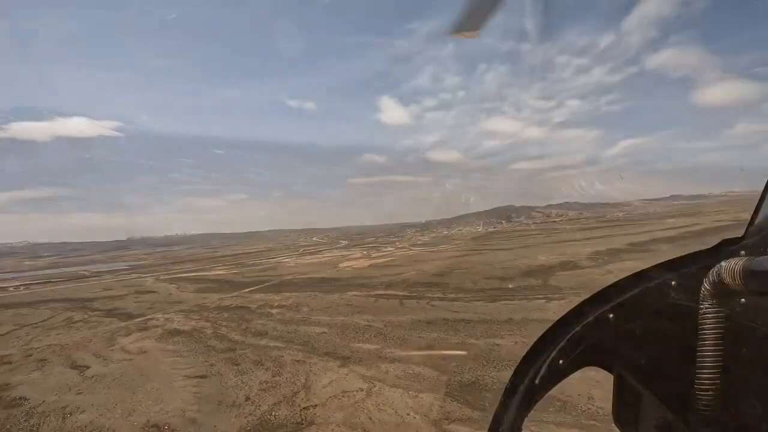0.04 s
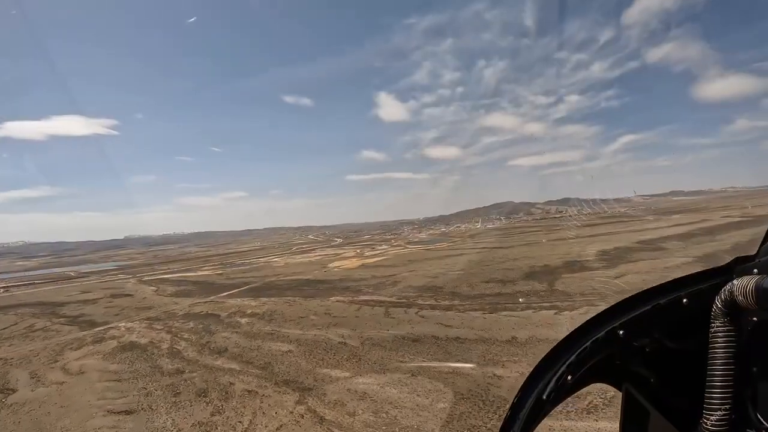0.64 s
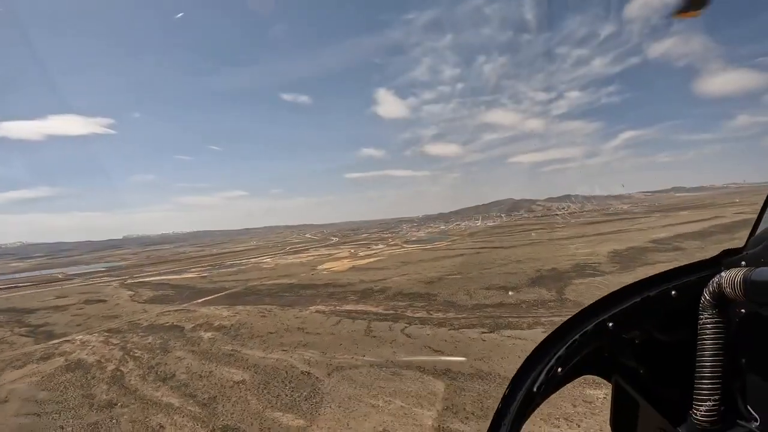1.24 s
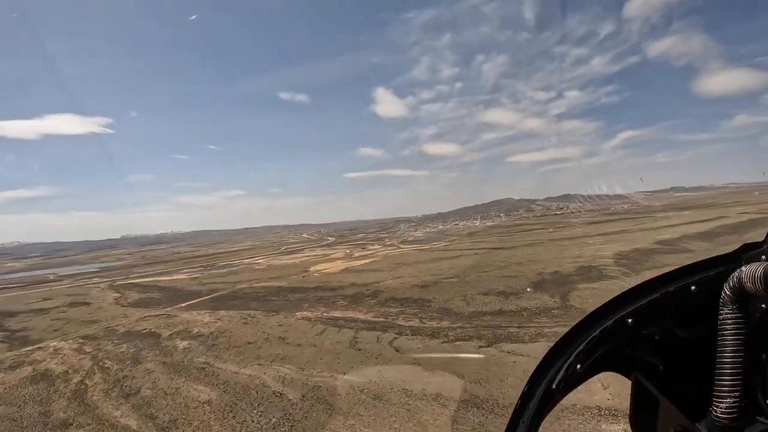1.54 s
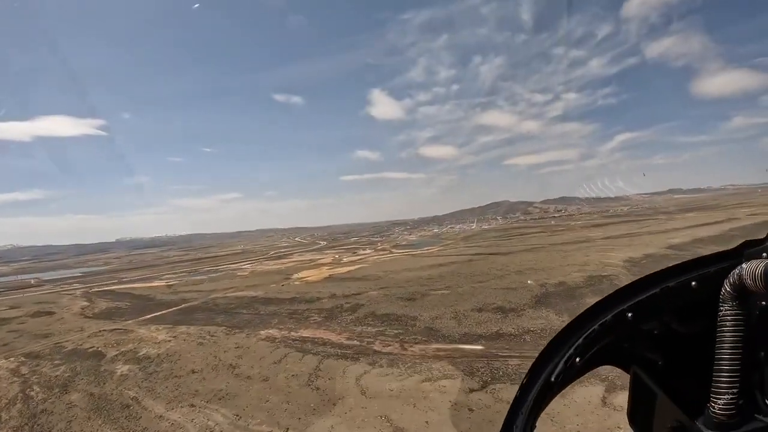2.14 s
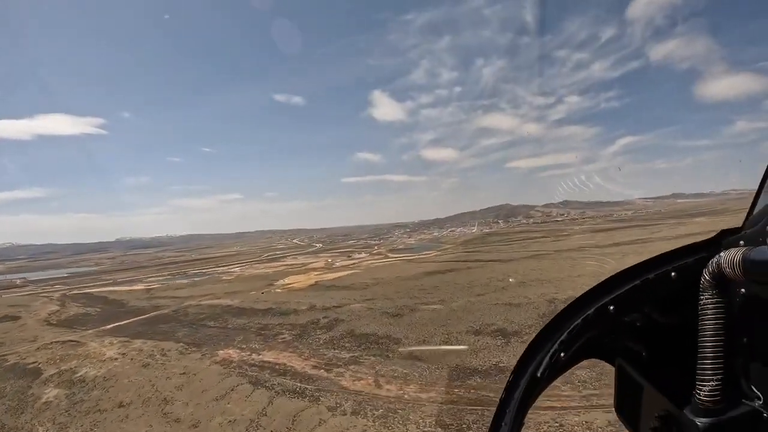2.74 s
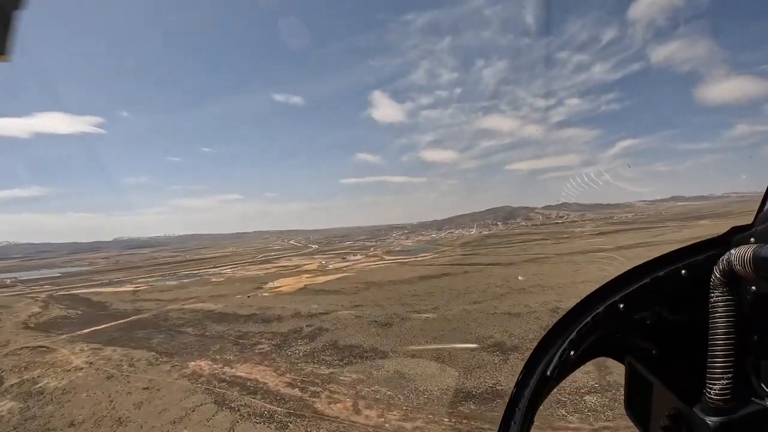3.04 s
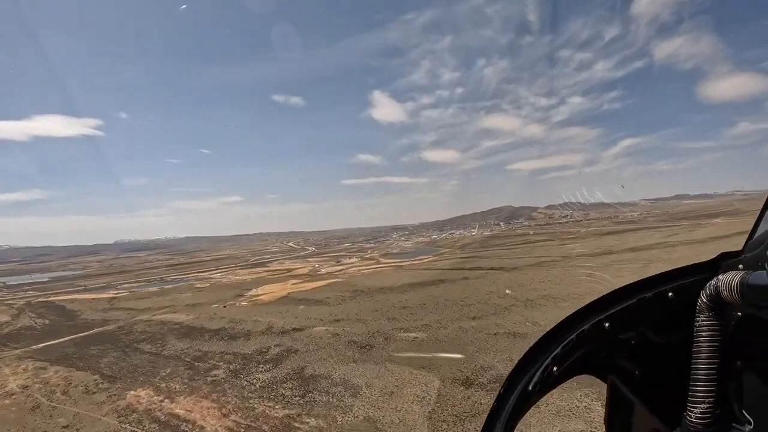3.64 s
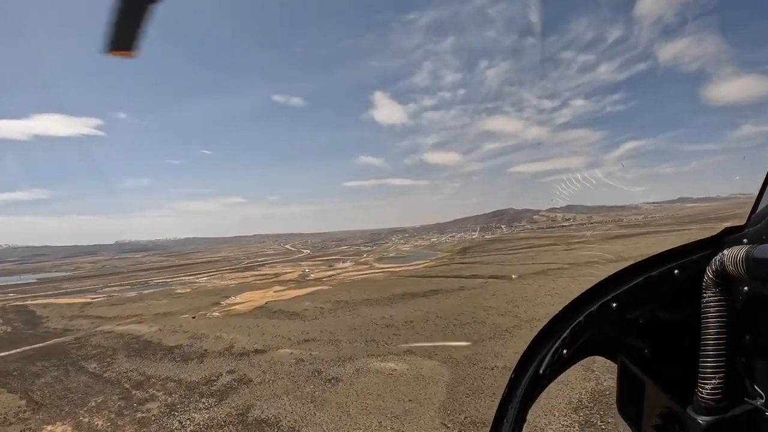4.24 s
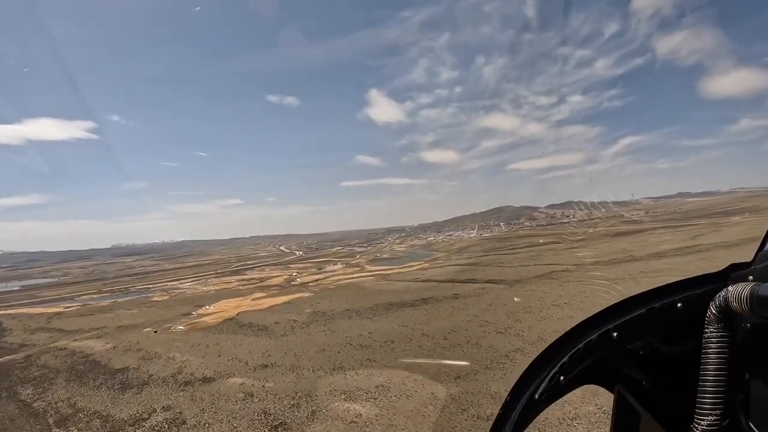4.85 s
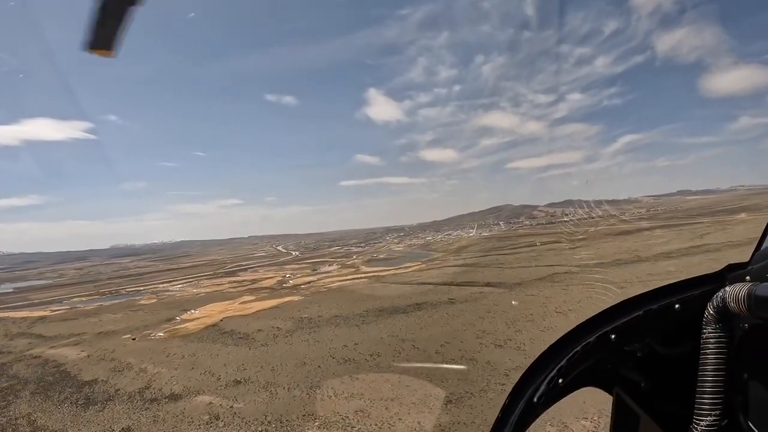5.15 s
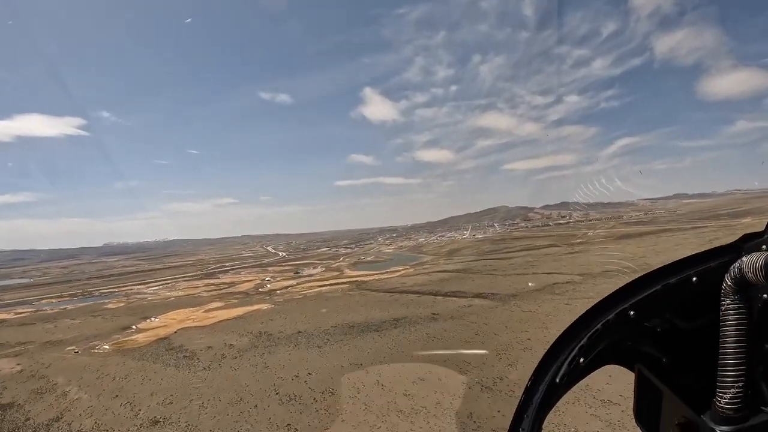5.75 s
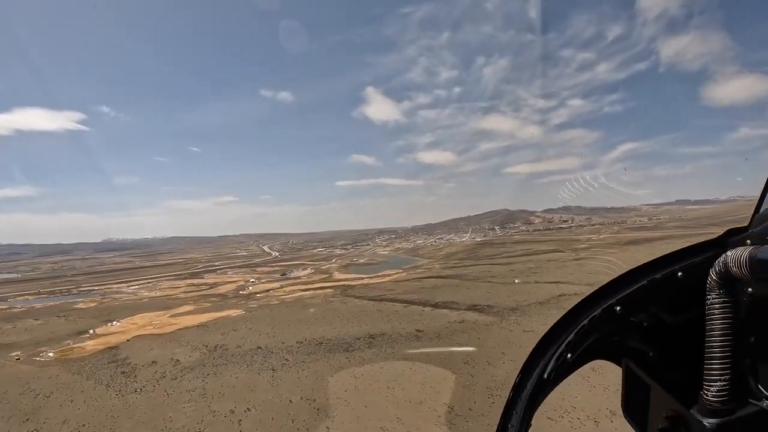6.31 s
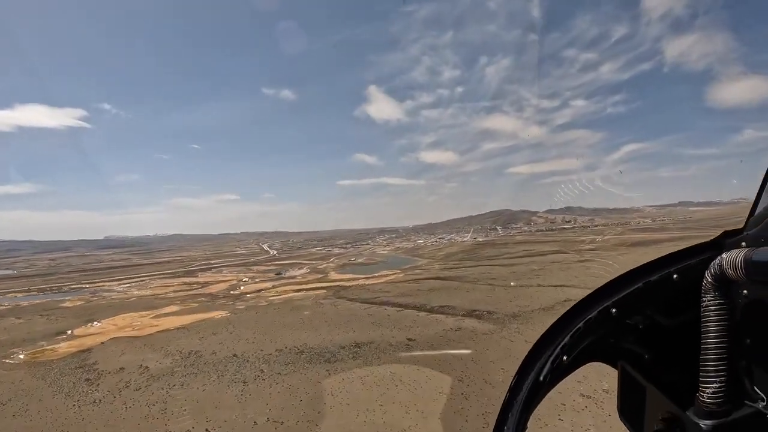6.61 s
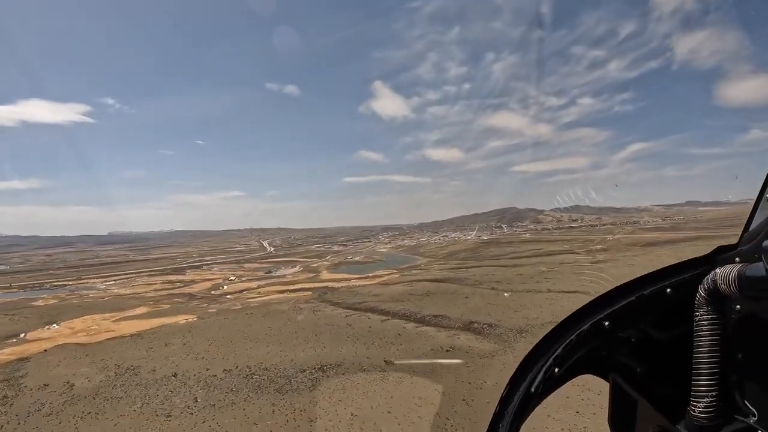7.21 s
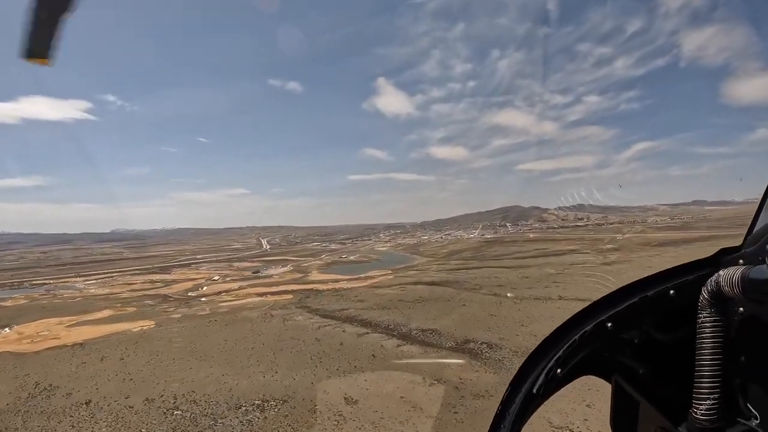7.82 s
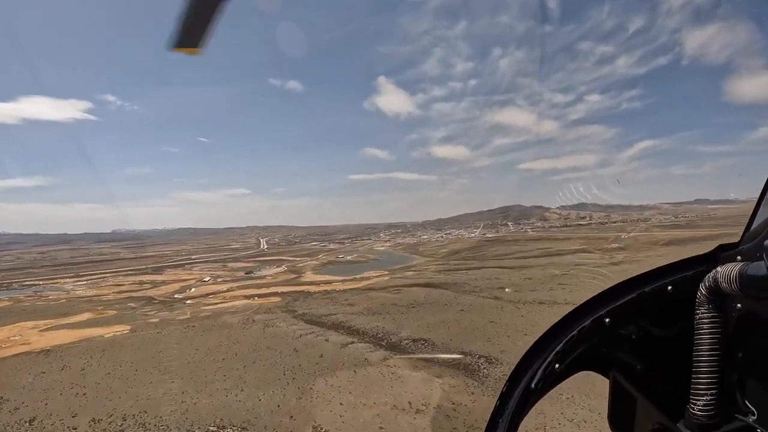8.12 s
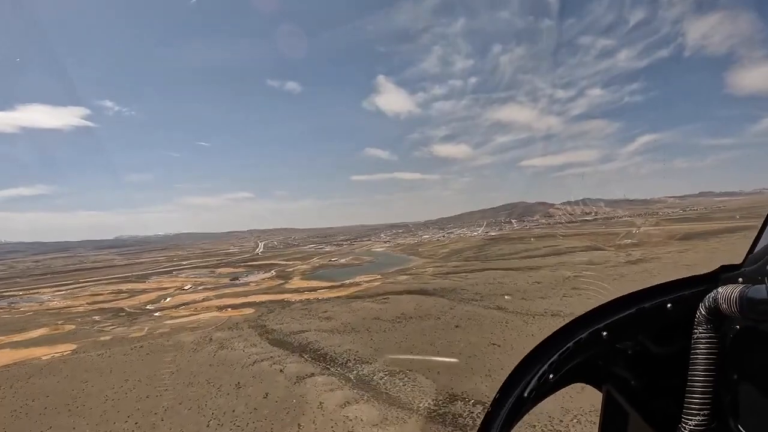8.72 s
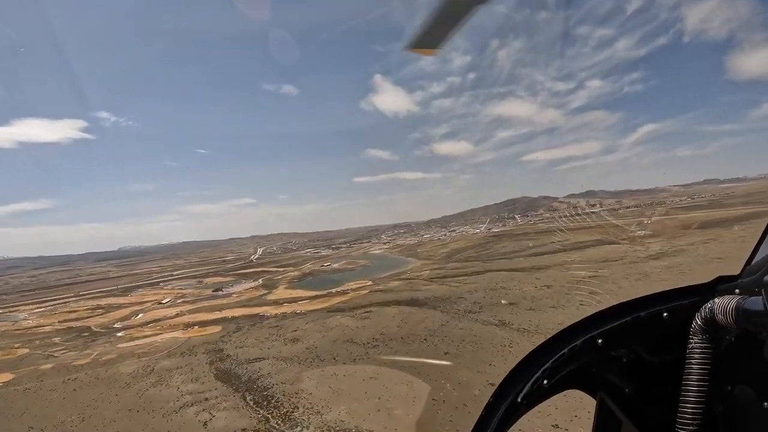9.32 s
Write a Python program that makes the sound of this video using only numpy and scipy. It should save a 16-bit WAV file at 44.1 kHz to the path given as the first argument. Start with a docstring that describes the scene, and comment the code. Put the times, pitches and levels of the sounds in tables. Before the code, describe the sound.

A helicopter in steady flight is heard from inside the cabin for about nine seconds. From the start, a constant roar of air rings in the enclosed space, over a deep, unevenly buffeting rumble from the rotor's wake. The main rotor's fast, low throb swells briefly at about 0.6 seconds and again around 1.3 to 1.6, is strongest from roughly 2.2 to 4 seconds, then mostly sinks into the rumble after 5.5. Throughout, the tail rotor adds a low drone that surges a few times a second, with a hum beneath it. A softer hiss of air along the canopy rises and falls gently. In the background, a thin, high gear whine wavers, ringing clearly in short spells and flickering in between, joined by a lower whine and a very faint turbine whistle. The engine speed holds steady to the end.

```python
"""A roar of air and a buffeting rumble fill the cabin of a helicopter in steady flight.
The main rotor throbs under the rumble of its wake, and the tail rotor drones in surges.
Rushing air rings the cabin's resonances and hisses along the canopy.
Behind them, meshing gear teeth and the turbine add thin, wavering whines."""
import sys
import numpy as np
from scipy import signal
from scipy.fft import rfft, irfft, next_fast_len
from scipy.io import wavfile
from scipy.ndimage import uniform_filter1d, minimum_filter1d, map_coordinates

SR = 44100
rng = np.random.default_rng(int(sys.argv[2]) if len(sys.argv) > 2 else 0)


def put_to_file(sound):
    """Save the sound as 16-bit audio at rate SR, in the file named by the first command-line argument."""
    columns = np.atleast_2d(sound).T  # one column per channel
    safe = np.clip(columns, -1, 1)
    whole_steps = np.round(safe * 32767)
    wavfile.write(sys.argv[1], SR, whole_steps.astype(np.int16))


N = 413216
BLADE_HZ = 39.1  # main rotor blade passage


def amp(db):
    """Decibels to gain."""
    return 10 ** (np.asarray(db) / 20)


def unit(x):
    """Scale to rms 1."""
    return x / np.sqrt(np.mean(np.abs(x) ** 2) + 1e-20)


def curve(rows):
    """One value per sample from (time [s], value) rows."""
    return np.interp(np.arange(N) / SR, *np.transpose(rows))


def spectrum_db(rows, hz):
    """(frequency [Hz], level [dB]) rows joined on a log axis."""
    knots_hz, knots_db = np.transpose(rows)
    return np.interp(np.log(hz + 1), np.log(knots_hz + 1), knots_db)


def wobble(rate_hz):
    """Smooth random curve, rate_hz knots a second."""
    knots = rng.standard_normal(int(N * rate_hz / SR) + 4)
    return map_coordinates(knots, [np.arange(N) * rate_hz / SR])


def filtered(x, response):
    """Apply a gain given as a function of Hz."""
    size = next_fast_len(N + SR // 2)
    return irfft(rfft(x, size) * response(np.fft.rfftfreq(size, 1 / SR)), size)[:N]


def noise(shape_db):
    """Noise of rms 1, its spectrum a function of Hz."""
    size = next_fast_len(N)
    hz = np.fft.rfftfreq(size, 1 / SR)
    white = rng.standard_normal(len(hz)) + 1j * rng.standard_normal(len(hz))
    return unit(irfft(amp(shape_db(hz)) * white, size)[:N])


def steadied(x, samples):
    """Even out swells longer than the window."""
    return x / np.sqrt(np.abs(uniform_filter1d(np.abs(x) ** 2, samples)) + 1e-9)


def patchy(x, depth_db):
    """Random gain in patches of about 80 Hz by 0.2 s; output rms 1."""
    frames = signal.stft(x, nperseg=2048)[2]
    patches = uniform_filter1d(rng.standard_normal(frames.shape), size=4, axis=0)
    patches = uniform_filter1d(patches, size=9, axis=1)
    return unit(signal.istft(frames * amp(depth_db * unit(patches)), nperseg=2048)[1][:N])


def tone(hz, speed, half_width_hz, scatter):
    """Machine tone: a steady part plus a share scattered by turbulence into a narrow band."""
    size = 16384
    offset_hz = np.fft.fftfreq(size, N / SR / size)
    skirt = 1 / np.sqrt((1 + (offset_hz / half_width_hz) ** 2)
                        * (1 + (offset_hz / (6 * half_width_hz)) ** 2))
    eddies = unit(np.fft.ifft(skirt * (rng.standard_normal(size) + 1j * rng.standard_normal(size))))
    swirl = steadied(np.sqrt(1 - scatter) + np.sqrt(scatter) * eddies, samples=600)
    swirl = np.interp(np.arange(N) * size / N, np.arange(size), swirl)
    return unit(np.real(swirl * np.exp(2j * np.pi * hz * np.cumsum(speed) / SR)))


def swell(middle_s, length_s, edge_s):
    """Envelope within 0..1: soft rise, hold, soft fall."""
    inside_s = (length_s + edge_s) / 2 - np.abs(np.arange(N) / SR - middle_s)
    return np.sin(np.pi / 2 * np.clip(inside_s / edge_s, 0, 1)) ** 2


def surging(rows, hz, speed, edge_s, detune, slip_turns, sag_hz=0, settle_s=0.093):
    """Tone in surges, each with a random phase slip and detuning; pitch sags by sag_hz at their ends."""
    out, t = np.zeros(N), np.arange(N) / SR
    turns, phase = hz * np.cumsum(speed) / SR, 0
    for (middle_s, length_s, db), (step, shift) in zip(rows, rng.uniform(-1.005, 1, (len(rows), 2))):
        envelope = swell(middle_s, length_s, edge_s)
        span = envelope > 0
        phase += slip_turns * step
        inside_s = np.maximum(length_s / 2 - np.abs(t[span] - middle_s), 0)
        bend_hz = hz * detune * shift - sag_hz * np.exp(-inside_s / settle_s)
        carrier = np.sin(2 * np.pi * (turns[span] + phase + np.cumsum(bend_hz) / SR))
        out[span] += amp(db) * envelope[span] * carrier
    return np.sqrt(2) * out


# air along the canopy: (time [s], level [dB])
SLIPSTREAM_DB = [(0, -51.5), (.2, -47), (.42, -45.5), (.81, -48.5), (1.08, -44.5), (1.25, -46.5),
                 (1.68, -43), (2.0, -46), (2.11, -44.5), (2.24, -47), (2.65, -44.5), (3.03, -43.5),
                 (3.12, -43), (3.25, -44.6), (3.55, -46.5), (3.8, -48), (4.14, -43.5), (4.33, -45.5),
                 (4.7, -49.5), (5.05, -48), (5.25, -45), (5.7, -44), (6.03, -43), (6.3, -45.3),
                 (6.75, -46.5), (7.4, -45), (7.7, -46.5), (7.92, -44.5), (8.3, -48), (8.5, -46),
                 (8.72, -49.5), (8.9, -46.5), (9.37, -48)]

def slipstream():
    """Rush of air in dB: its level, and its swing about the mean."""
    db = curve(SLIPSTREAM_DB)
    return db, db - db.mean()


# blade rows: (centre [Hz], half width [Hz], level re slipstream [dB])
TURBINE_BANDS = [(7895, 80, -43.5), (10120, 260, -42.5), (12160, 400, -37), (13750, 290, -41.2)]
# lower whistle: (time [s], level [dB])
WHISTLE_DB = [(0, -84), (.8, -84.5), (1.1, -77.5), (4.1, -78), (4.7, -83), (5.75, -75), (6.6, -77),
              (7.05, -74.5), (8.3, -79), (8.85, -73), (9.37, -73)]
# upper whistle: (middle [s], length [s], level [dB])
WHISTLE_GLINTS = [(.55, .03, -81.5), (1.02, .03, -82), (2.11, .09, -78.5), (3.29, .035, -76),
                  (3.49, .04, -82), (4.27, .04, -79.5), (4.44, .05, -79), (4.56, .04, -75),
                  (4.99, .06, -81), (5.56, .04, -80), (6.07, .04, -76), (6.99, .035, -77.5),
                  (8.68, .04, -83), (9.19, .04, -78)]

def turbine(speed, rush_db):
    """The compressor whistles and glints; its blade rows sing in bands that follow the rush of air."""
    bands = sum(amp(db) * noise(lambda hz: -20 * np.log10(1 + ((hz - centre_hz) / half_width_hz) ** 2))
                for centre_hz, half_width_hz, db in TURBINE_BANDS)
    bands *= amp(rush_db + 1.2 * wobble(25))
    whistle = amp(curve(WHISTLE_DB)) * tone(4775, speed, half_width_hz=20, scatter=0.85)
    glints = surging(WHISTLE_GLINTS, 7920, speed, edge_s=0.02, detune=0.002, slip_turns=0.5)
    return bands + whistle + glints


# main mesh ringing clear: (middle [s], length [s], level [dB])
MESH_SPELLS = [(.06, .14, -50), (.4, .14, -49), (0.592, .21, -45.5), (0.78, 0.13, -49), (1.162, .09, -48.5),
               (1.58, 0.073, -51), (1.85, 0.21, -52), (2.144, 0.24, -45.3), (2.625, 0.18, -47),
               (2.767, .11, -43.5), (3.112, 0.15, -42.5), (3.265, 0.15, -45.5), (3.663, .57, -48.5),
               (4.27, .1, -49), (4.765, .66, -45.5), (5.4, .28, -48.8), (6.113, .17, -45),
               (6.81, 0.065, -49.5), (6.93, 0.16, -47), (7.67, 0.15, -48.5), (8.29, 0.14, -47.5),
               (8.558, .09, -46.5), (8.755, 0.11, -46.5), (8.965, 0.075, -45.5)]
# lower mesh: (time [s], level [dB])
LOWER_MESH_DB = [(0, -52), (.95, -49.5), (1.02, -43), (1.15, -55.5), (1.6, -41), (1.87, -61), (2.06, -39),
                 (2.2, -49), (2.48, -40), (2.62, -47), (3.15, -46), (3.6, -47), (4.19, -55), (4.26, -35),
                 (4.34, -48), (4.72, -49.5), (5.75, -43.5), (6.5, -47.5), (7.3, -46), (7.42, -36),
                 (7.55, -49), (7.71, -39), (7.79, -42), (7.88, -41), (8.15, -43), (8.43, -49), (8.66, -44),
                 (9.0, -40.5), (9.23, -53), (9.37, -42.5)]
# faint drive train tones: (frequency [Hz], width [Hz], level [dB])
FAINT_WHINES = [(1467, 14, -53.8), (2448, 16, -68), (2800, 24, -74), (2935, 36, -70.5), (3965, 24, -76.5)]

def gearbox(speed, swing_db):
    """Meshing teeth whine: the main tone rings in spells and flickers between; faint ones ride the air."""
    mesh_hz, sag_hz, edge_s = 1897, 9, 0.035
    flutter_db = 1.15 * wobble(55) - 0.55 * np.minimum(wobble(22), 0) ** 2  # tremble and brief dips
    clear = surging(MESH_SPELLS, mesh_hz, speed, edge_s, detune=0.0006, slip_turns=0.25, sag_hz=sag_hz)
    ringing = sum(swell(middle_s, length_s, edge_s) for middle_s, length_s, _ in MESH_SPELLS)
    flicker = amp(-52.5 - 4 * ringing) * tone(mesh_hz - sag_hz / 2, speed, half_width_hz=17, scatter=0.97)
    lower = amp(curve(LOWER_MESH_DB)) * tone(1294, speed, half_width_hz=14, scatter=0.95)
    faint = sum(amp(db) * tone(hz, speed, width_hz / 2, scatter=0.8) for hz, width_hz, db in FAINT_WHINES)
    return amp(flutter_db) * clear + flicker + lower + amp(0.97 * swing_db) * faint


# cabin air noise: (frequency [Hz], relative density [dB])
ROAR_SPECTRUM = [(25, 1.5), (60, -2.5), (100, 0), (135, -2), (185, 0.5), (225, -5.5), (310, -4),
                 (400, -7.5), (540, -10.5), (730, -13), (920, -20), (1200, -23), (1480, -33.5), (3000, -56),
                 (9000, -110)]
# air and panel resonances: (centre [Hz], width [Hz], lift [dB])
CABIN_MODES = [(268.7, 45, 3.5), (351.6, 22, 2.5), (431, 24, 4.5), (486.4, 38, 4.5), (583.5, 11, 4),
               (666, 56, 2.5), (763, 15, 2.5), (819, 55, 4), (1093, 50, 3), (1284, 190, 2.5)]
# irregular swells and dips in the roar's low-mid band: (time [s], gain [dB])
LOW_MID_DB = [(0, -1), (.45, -1), (.68, -1.2), (.97, -2), (1.2, 2.5), (1.38, -2), (1.53, 3), (1.85, -2.5),
              (2.1, 0.5), (2.3, -1.5), (3.3, -0.1), (3.57, 0.7), (3.76, -1), (4.08, -1), (4.25, .8),
              (5.35, 0), (5.5, 2.5), (5.7, 1), (6.0, -1.7), (6.35, 3), (6.6, 0.5), (6.8, 2.5), (7.2, -0.5),
              (7.47, 1.5), (7.9, -0.1), (8.37, 2), (8.85, -1.3), (9.15, 1.5), (9.37, -3)]
# droning canopy panel: (time [s], gain [dB])
PANEL_DB = [(0, -0.5), (1.2, 0.5), (1.75, 1), (2.7, 0.5), (3.3, -1), (4.2, 0.5), (4.7, 3.5), (5.3, -1),
            (6.2, 0.5), (7.0, 0.7), (7.7, -1), (8.4, 0), (9.37, 1.5)]

def cabin_roar(swing_db):
    """Air roars through the cabin's resonances; above the crossover it follows the slipstream."""
    low_mid_hz, panel_hz, panel_half_width_hz, crossover_hz = 330, 480, 45, 583

    def modes_db(hz):
        return sum(db / (1 + (2 * (hz - centre) / width) ** 4) for centre, width, db in CABIN_MODES)

    roar = noise(lambda hz: spectrum_db(ROAR_SPECTRUM, hz) + modes_db(hz))
    roar = steadied(patchy(roar, depth_db=0.53), samples=6000)
    low_mid = filtered(roar, lambda hz: 1 / (1 + (2 * np.log((hz + 1) / low_mid_hz)) ** 4))
    roar += amp(curve(LOW_MID_DB)) * low_mid.std() * steadied(low_mid, samples=6000) - low_mid
    panel = filtered(roar, lambda hz: 1 / (1 + ((hz - panel_hz) / panel_half_width_hz) ** 4))
    roar += (amp(curve(PANEL_DB)) - 1) * panel
    deep = filtered(roar, lambda hz: 1 / (1 + (hz / crossover_hz) ** 6))
    return deep + amp(0.6 * swing_db) * (roar - deep)


# canopy hiss: (frequency [Hz], relative density [dB])
HISS_SPECTRUM = [(500, -4.5), (1200, 6.5), (1650, 4.5), (2000, 6), (2350, -1), (3300, -1.5), (3650, -7),
                 (5000, -13.5), (7500, -21.5), (9700, -31), (10700, -39.5), (13200, -37), (14300, -31.5),
                 (15700, -45)]
# cabin roar: (time [s], level [dB])
ROAR_DB = [(0, -23), (.42, -20), (1, -22.5), (1.5, -22.5), (2.4, -21.5), (3.55, -21.5), (3.8, -23),
           (4.3, -22), (6.5, -21.5), (9.37, -21.5)]

def airflow(speed, rush_db, swing_db):
    """Cabin roar and canopy hiss, shaken by the same eddies and pulsing a little with each blade."""
    roar = cabin_roar(swing_db)
    hiss = patchy(noise(lambda hz: spectrum_db(HISS_SPECTRUM, hz)), depth_db=1.5)
    beat = np.sin(2 * np.pi * BLADE_HZ * np.cumsum(speed) / SR)
    eddies, gusts = wobble(50), wobble(20)
    roar_db = curve(ROAR_DB) - 0.37 * gusts + 0.92 * eddies + 0.82 * beat
    hiss_db = rush_db + 0.84 * eddies + 0.2 * beat
    return amp(roar_db) * roar + amp(hiss_db) * hiss


# tail rotor drone: (middle [s], length [s], level [dB])
TAIL_SURGES = [(.2, 0.081, -21), (.32, 0.079, -27), (.55, 0.35, -28), (.8, 0.17, -25.5),
               (1.09, 0.36, -23.5), (1.46, 0.32, -20.3), (1.855, 0.35, -22.5), (2.145, .16, -23.5),
               (2.5, 0.15, -25.5), (2.81, 0.31, -24), (3.05, 0.16, -25), (3.26, 0.29, -27),
               (3.53, 0.14, -30.5), (3.77, 0.19, -27), (4.01, .23, -24), (4.26, 0.18, -23),
               (4.74, 0.2, -24), (4.99, 0.27, -26.5), (5.3, 0.18, -24), (5.645, 0.091, -20.3),
               (5.79, 0.077, -23.5), (5.93, 0.11, -28), (6.125, .14, -21), (6.455, 0.091, -20.5),
               (6.585, 0.15, -21.5), (6.92, 0.19, -21), (7.28, 0.11, -20.8), (7.45, .12, -27),
               (7.66, 0.23, -28), (7.86, 0.14, -24.5), (8.0, 0.13, -23.3), (8.21, 0.24, -28),
               (8.41, 0.05, -26), (8.55, 0.2, -24.5), (8.83, 0.14, -25), (8.99, 0.14, -23),
               (9.32, 0.13, -23)]
# hum an octave below: (time [s], level [dB])
TAIL_HUM_DB = [(0, -33), (1, -34), (1.65, -23.5), (2, -36), (3.3, -36), (3.7, -38), (4.15, -28.5),
               (4.7, -39.5), (6.1, -26.5), (6.9, -42), (7.8, -27), (8.3, -32.5), (9.37, -30.5)]

def tail_rotor(speed):
    """The drone surges a few times a second in the main rotor's wake, over a rough bed and a hum."""
    tail_hz, bed_db = 169.4, -36.5
    drone = surging(TAIL_SURGES, tail_hz, speed, edge_s=0.08, detune=0.008, slip_turns=0.25)
    bed = amp(bed_db) * tone(tail_hz, speed, half_width_hz=3.9, scatter=1.0)
    hum = amp(curve(TAIL_HUM_DB)) * tone(tail_hz / 2, speed, half_width_hz=5.5, scatter=0.91)
    return drone + bed + hum


# blade throb: (time [s], level [dB])
THROB_DB = [(0, -40), (.48, -34), (.6, -18.5), (.74, -34), (1.15, -31), (1.27, -21), (1.6, -22), (1.7, -36),
            (1.9, -25), (2.15, -31), (2.26, -16), (2.42, -19.5), (2.54, -17), (2.68, -21), (2.85, -14.5),
            (3.14, -20), (3.25, -15.5), (3.4, -15.5), (3.52, -18.5), (3.64, -22), (3.73, -18), (3.87, -19),
            (4.05, -33.5), (4.95, -26), (5.2, -29), (5.46, -23), (5.6, -34.5), (9.37, -37)]
# target for throb plus wake rumble: (time [s], level [dB])
ROTOR_TOTAL_DB = [(0, -20.5), (.42, -28.5), (.56, -15.5), (.8, -18), (1.16, -26.5), (1.28, -18),
                  (1.58, -19), (1.69, -24.5), (1.92, -20), (2.25, -15.5), (2.42, -21.5), (2.54, -19.5),
                  (2.95, -17), (3.06, -16), (3.18, -14), (3.55, -16.5), (3.63, -22), (3.73, -15.5),
                  (3.92, -18.5), (4.15, -26), (4.42, -18.5), (4.7, -19), (4.95, -19), (5.22, -20.5),
                  (5.46, -16.5), (5.55, -30), (5.65, -20), (5.96, -24.5), (6.1, -23), (6.72, -18.5),
                  (6.82, -27), (6.92, -21.5), (7.6, -20), (7.77, -22.5), (8.0, -19.5), (8.8, -21.5),
                  (9.1, -17), (9.37, -20)]
# wake on the fuselage: (frequency [Hz], relative density [dB])
RUMBLE_SPECTRUM = [(4, -12), (12, -12), (20, -4), (28, 5.5), (44, -0.5), (52, -4), (66, -25), (110, -35),
                   (300, -106), (900, -120)]

def main_rotor(speed):
    """Passing blades throb; their wake buffets the fuselage, less when the throb is strong."""
    throb_rms, total_rms = amp(curve(THROB_DB)), amp(curve(ROTOR_TOTAL_DB))
    rumble_rms = np.sqrt(np.maximum(total_rms ** 2 - throb_rms ** 2, 0.18 * total_rms ** 2))
    rumble = steadied(noise(lambda hz: spectrum_db(RUMBLE_SPECTRUM, hz)), samples=6500)
    throb = tone(BLADE_HZ, speed, half_width_hz=1.5, scatter=0.17)
    return throb_rms * throb + rumble_rms * rumble


# drive train: (time [s], speed re governed [ratio])
DRIVE_SPEED = [(0, .9994), (3, .9994), (3.5, 1.0002), (5.8, 1), (8, .9985), (9.37, .9985)]

def scene():
    """The governor holds the whole drive train at nearly one speed."""
    speed = curve(DRIVE_SPEED) + 0.000805 * wobble(4)
    rush_db, swing_db = slipstream()
    rotors = main_rotor(speed) + tail_rotor(speed)
    air = airflow(speed, rush_db, swing_db)
    whines = gearbox(speed, swing_db) + turbine(speed, rush_db)
    return (rotors + air + whines)[None]


def record(dry):
    """Smooth peak limiter, then a sharp low-pass."""
    ceiling_db, window_samples, top_hz = -5.3, 300, 15750
    gain = np.minimum(1, amp(ceiling_db) / (np.abs(dry[0]) + 1e-9))
    gain = minimum_filter1d(gain, 2 * window_samples)
    gain = uniform_filter1d(uniform_filter1d(gain, window_samples), window_samples)
    return filtered(dry[0] * gain, lambda hz: hz < top_hz)[None]


dry = scene()
out = record(dry)
put_to_file(out)
```